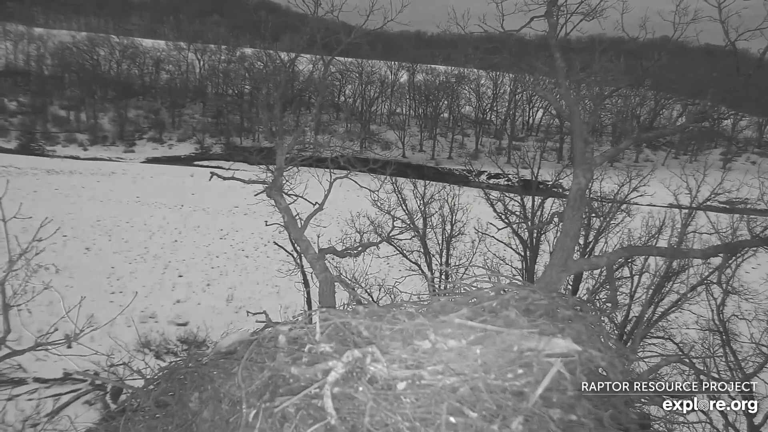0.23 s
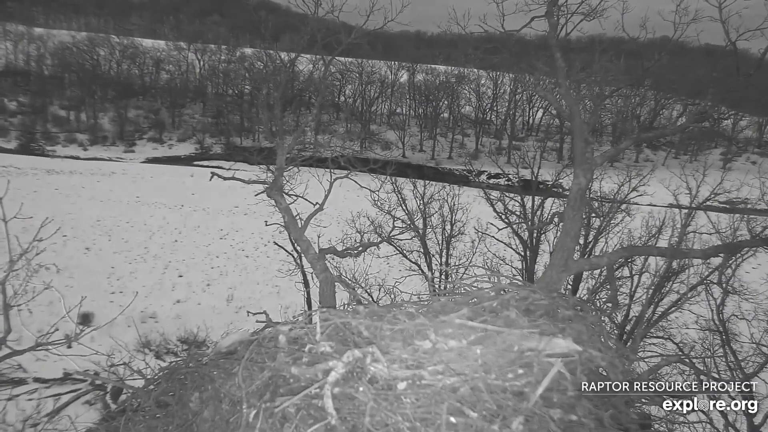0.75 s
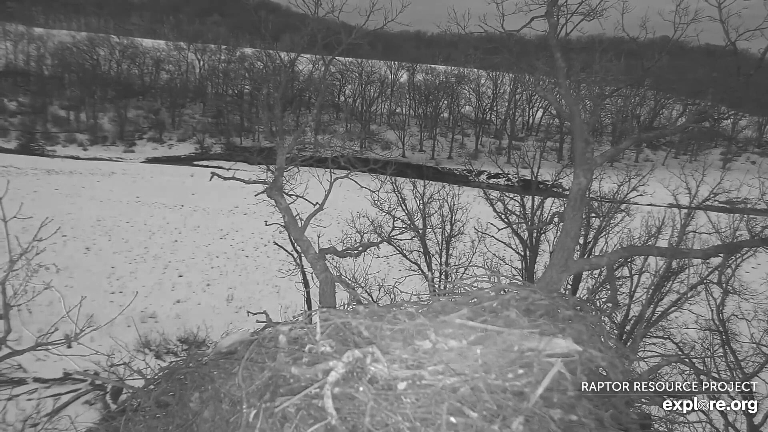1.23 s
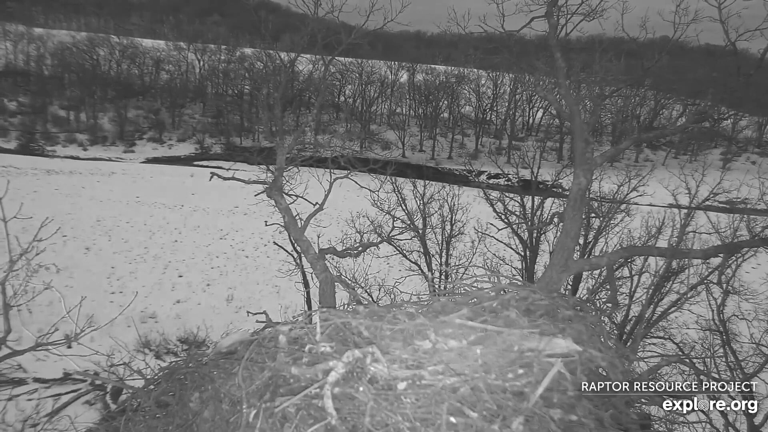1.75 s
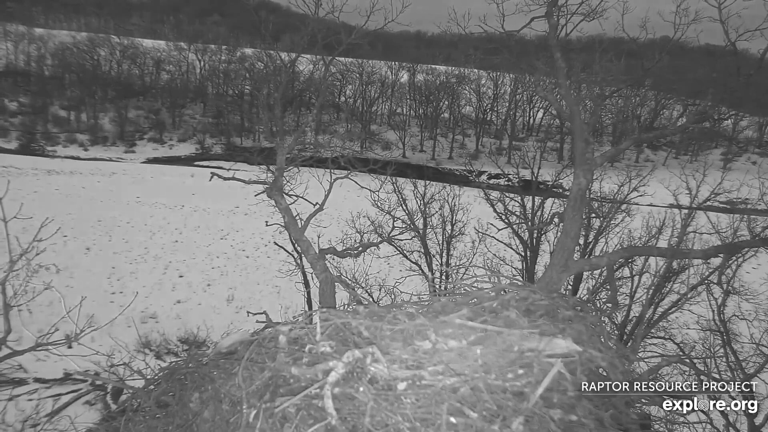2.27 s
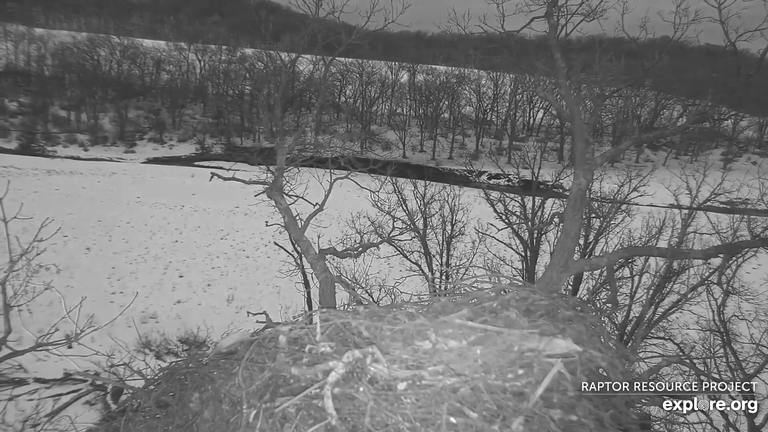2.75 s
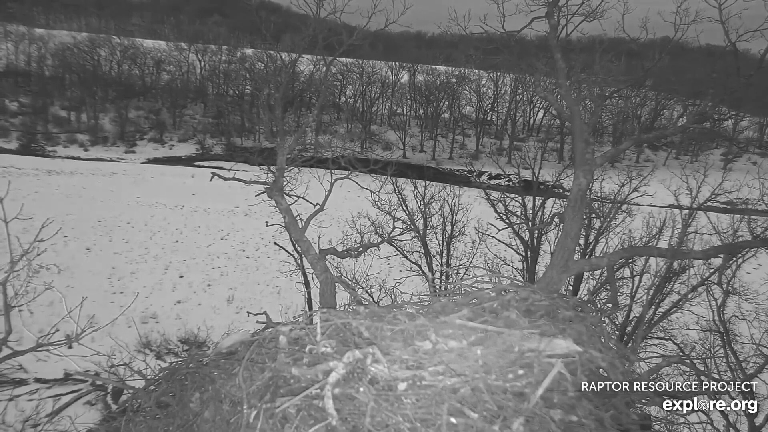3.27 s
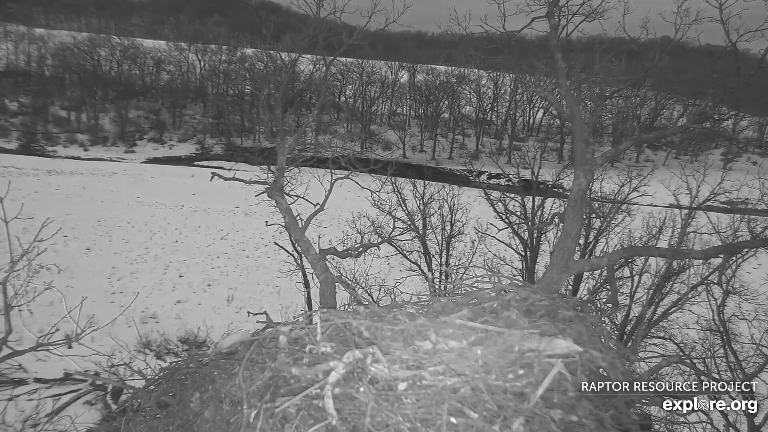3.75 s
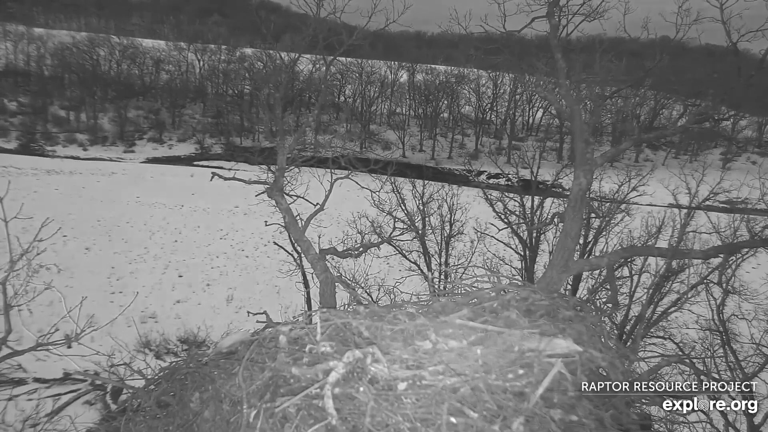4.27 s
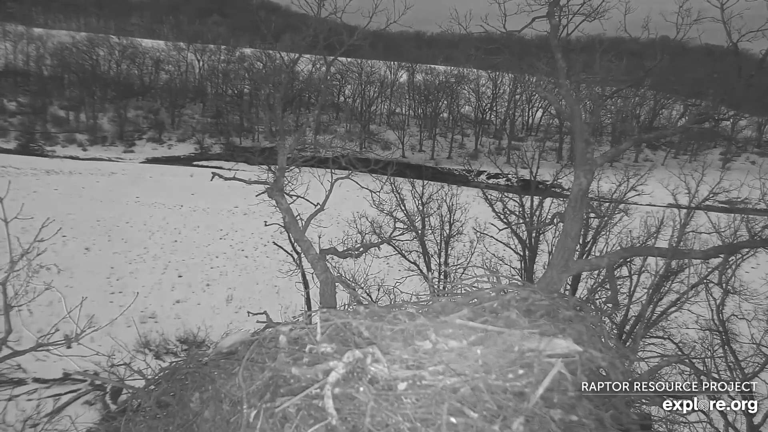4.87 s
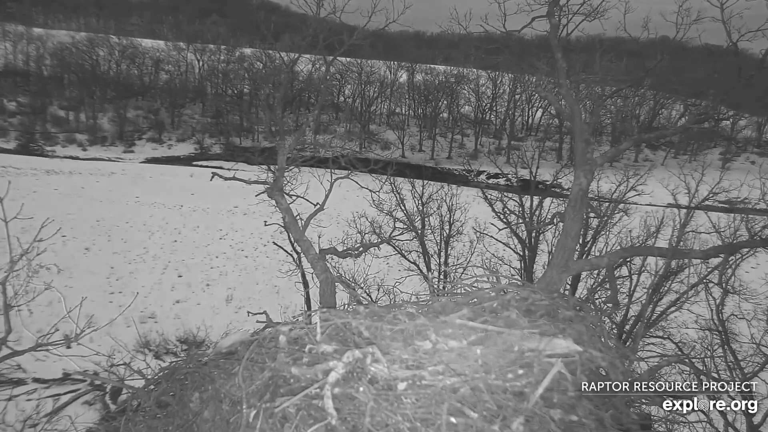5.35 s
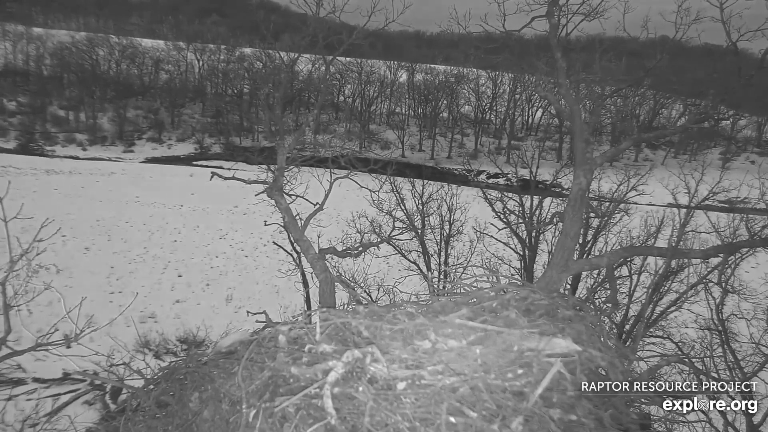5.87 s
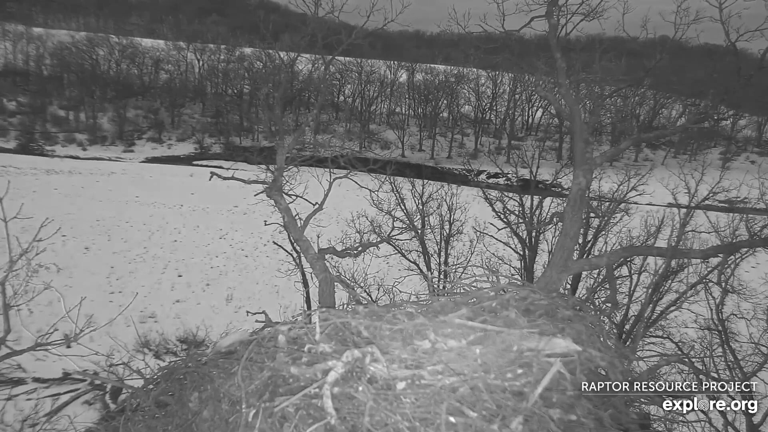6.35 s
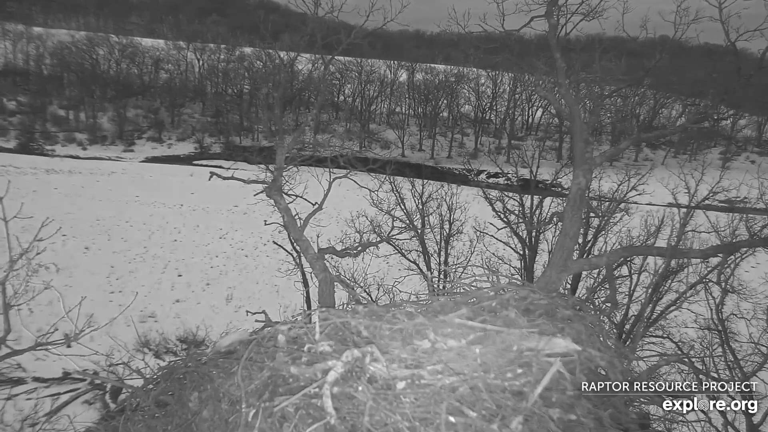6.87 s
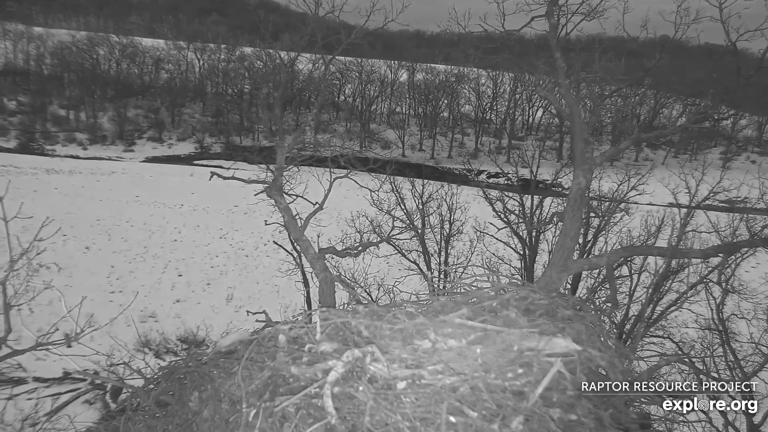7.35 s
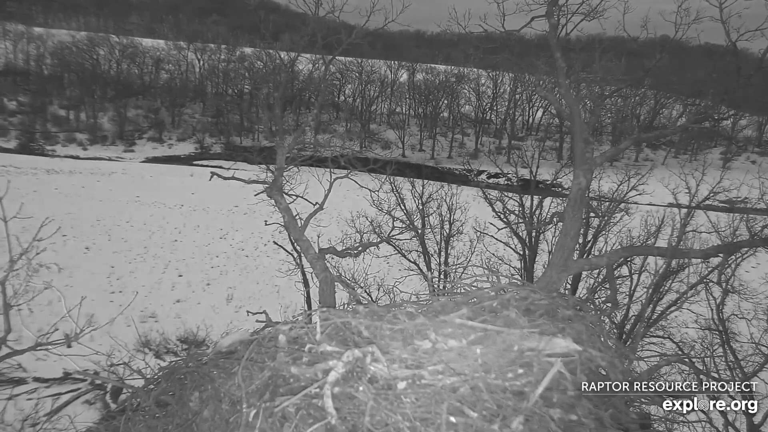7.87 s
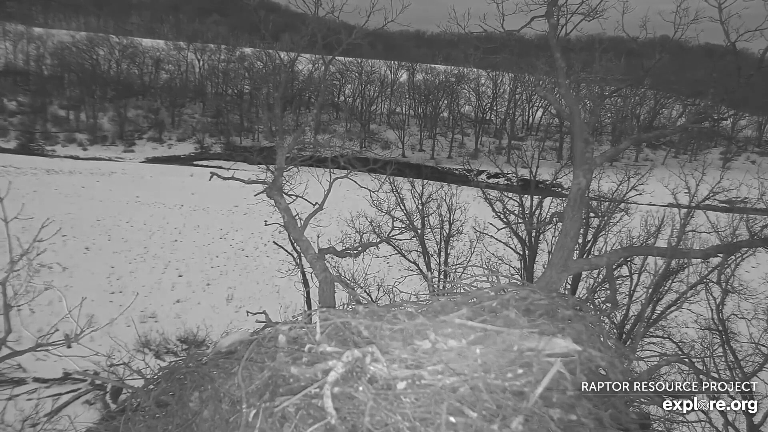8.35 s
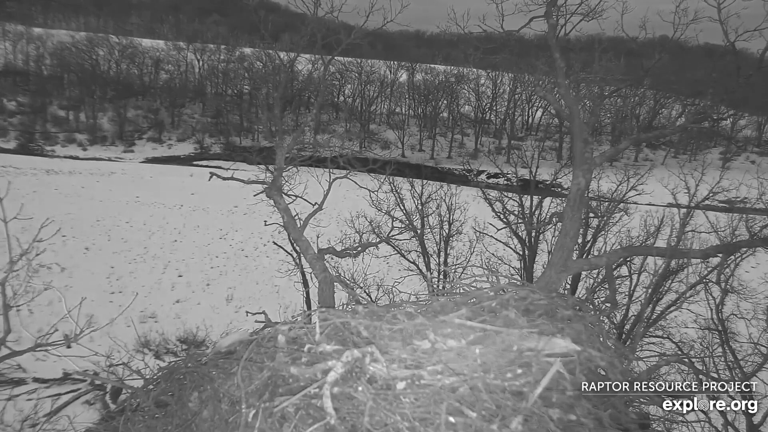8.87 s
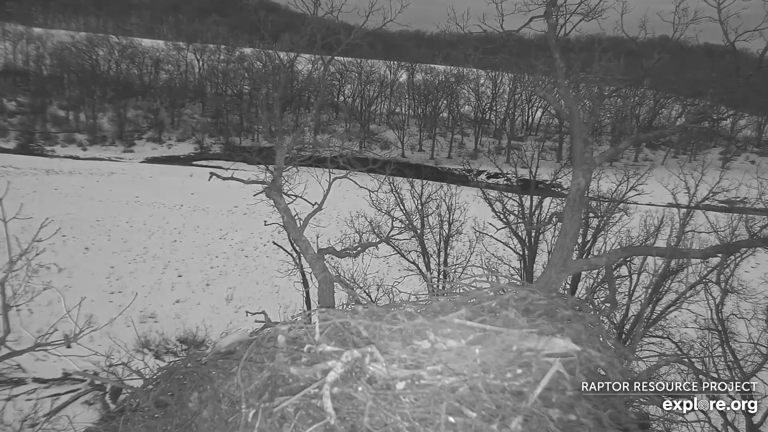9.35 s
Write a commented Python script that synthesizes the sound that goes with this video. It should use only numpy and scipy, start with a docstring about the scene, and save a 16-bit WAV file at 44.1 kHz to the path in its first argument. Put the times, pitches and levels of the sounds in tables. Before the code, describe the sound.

A bald eagle gives five hoarse squeaky yelps, then four chattering runs of high, mostly descending piping notes, over a steady low outdoor rumble.

```python
"""High in a tree, a microphone close to the nest hears a bald eagle over a steady far rumble, drones and hiss.
After faint twig ticks come five squeaky, hoarse yelps, then four chattering runs of mostly descending notes.
Notes are sums of trembling harmonics, squeals are gliding sines, rasps are random puffs ringing the throat.
The rest is shaped noise, wavering sines and damped ticks; limbs, twigs and woods echo the bird and the ticks."""
import sys
import numpy as np
from scipy import signal
from scipy.fft import rfft, irfft, next_fast_len
from scipy.io import wavfile

SR = 44100
rng = np.random.default_rng(int(sys.argv[2]) if len(sys.argv) > 2 else 0)


def digitize_waveform(pressure):
    """Quantize a signal to 16-bit integers and store it at the path in sys.argv[1].

    Rows of a 2-D input are taken as channels; values are limited to [-1, 1].
    """
    field = np.atleast_2d(pressure).T
    bounded = np.clip(field, -1, 1)
    quanta = np.round(bounded * 32767).astype(np.int16)
    wavfile.write(sys.argv[1], SR, quanta)


N = 424241  # samples, about 9.6 s

# Distant rumble. Each row: frequency in Hz, relative density in dB per Hz.
RUMBLE_SPECTRUM = [(20, -34), (40, -36.5), (58, -17.5), (70, -11), (88, -7), (100, -2), (150, 1), (210, -7),
                   (300, -13), (400, -21.5), (510, -30.5), (750, -33.5), (1200, -46), (2200, -60.5),
                   (5000, -81)]
# Slow swell of the rumble. Each row: time in seconds, relative levels of deep roar, body and upper wash in dB.
RUMBLE_SWELL = [(0, -21, -31, -50), (1.8, -20, -31, -50), (2.5, -19, -29, -49), (3.7, -21.5, -30.5, -49),
                (4.2, -22, -33.5, -50), (5.6, -21, -31.5, -52), (7.3, -19.5, -32, -49),
                (9.6, -19, -31, -48.5)]
# Wavering drones of far machinery. Each row: pitch in Hz, rms waver in Hz, level before fading in dB.
MACHINE_DRONES = [(72.45, 0.75, -39.5), (95.83, 0.31, -25), (103.1, .9, -32.5), (142.9, 2.54, -31.5)]
# Microphone hiss. Each row: frequency in Hz, relative density in dB per Hz.
HISS_SPECTRUM = [(1000, -42), (2300, -18.5), (3300, -9), (5000, -5), (7500, -3), (11000, 0.5), (15500, 1.5)]
# Faint twig ticks in the nest. Each row: start in seconds, central pitch in Hz, relative level in dB.
TWIG_TICKS = [(.939, 5030, -49.5), (1.002, 4900, -48), (1.009, 5600, -42), (1.081, 5300, -48),
              (1.133, 5100, -45), (3.935, 6560, -41.5)]
# Early reflections off nest and limbs. Each row: delay in seconds, relative gain.
LIMB_REFLECTIONS = [(.0047, 0.018), (.0093, -0.17), (0.0128, -0.03), (0.0193, 0.5), (.0285, -.17),
                    (.039, 0.021)]
# Ring of the woods. Each row: frequency in Hz, time to fall 60 dB in seconds.
WOODS_RING = [(1000, 0.098), (2200, 0.54), (2900, 0.64), (3600, 0.47), (6000, 0.48), (10000, 0.053)]
# Echo share as the bird yelps towards the microphone, then throws its head back to chatter.
# Each row: time in seconds, level sent to the echoes in dB.
HEAD_TURN_ECHO = [(1.9, -5), (3.7, -6), (4.4, 1.5), (9.6, -5.5)]
# Windpipe and beak passing the harmonics of every whistle. Each row: frequency in Hz, gain in dB.
WINDPIPE_GAIN = [(2100, -1.5), (2800, -4), (3050, -6.5), (3450, -1.5), (3800, -3.5), (4250, -2.5),
                 (5350, -16), (5650, -1.5), (6100, 0.5), (6400, -7.5), (7100, -16.5), (8350, -41),
                 (8800, -13.5), (9150, -10.5), (10400, -36), (12000, -26), (14000, -38)]
# The bird's excitement, which sets top harmonics and scratch. Each row: time in seconds, excitement in dB.
EXCITEMENT_CURVE = [(3.2, 7), (4.7, -13), (5.8, -12.5), (7.4, 1.5), (9.2, 1.5)]
# Resonances of the wide open throat. Each row: frequency in Hz, width in Hz, relative level in dB.
THROAT_RESONANCES = [(920, 290, -1), (1306, 340, -3.5), (2040, 1300, -6), (2830, 340, -4), (3570, 480, 4),
                     (4340, 150, 0), (5160, 540, 1), (6180, 1600, 1)]
# Yelps: a whistle over a lower tone that turns hoarse, breaks, and closes with a croak.
# Each row: start in seconds, length in seconds, pitch in Hz, relative level in dB, extra level of the octave
# in dB, scoop as a share of pitch, lower tone in relative dB, delay to the break in seconds, break in
# relative dB, delay to the closing in seconds, croak in relative dB.
YELP_NOTES = [(1.949, .016, 3470, -23, -20, 0.093, -58, 0.14, -31.5, 0.17, -56),
              (2.325, .017, 3465, -18, -10, .04, -45, 0.13, -30, 0.16, -49),
              (2.734, 0.023, 3432, -17.5, -2.5, 0.026, -48, 0.11, -32, 0.14, -52),
              (3.144, 0.041, 2822, -25.5, -3, .12, -45, .088, -46, .142, -35),
              (3.582, 0.038, 3474, -23.5, 1, 0.023, -43, 0.075, -53, 0.12, -42)]
# Thin squeals where the voice breaks.
# Each row: start in seconds, length in seconds, start pitch in Hz, end pitch in Hz, relative level in dB.
VOICE_BREAKS = [(2.033, 0.085, 5400, 6400, -36.5), (2.411, 0.059, 5620, 6200, -35),
                (2.818, 0.076, 6350, 6370, -40), (3.583, .025, 4040, 4050, -43),
                (3.597, 0.017, 6330, 6200, -33), (4.49, .022, 6670, 6500, -44),
                (8.22, .082, 3870, 3790, -56), (8.87, .01, 5540, 5120, -27.5)]
# Chatter on the low side of the syrinx, in four runs.
# Each row: start in seconds, length in seconds, pitch in Hz, relative level in dB, extra of the octave in dB.
LOW_SIDE_NOTES = [(4.477, 0.035, 3034, -32, -8), (4.59, 0.025, 2990, -32, -6.5),
                  (4.686, 0.026, 2923, -32, 0), (4.798, 0.04, 2850, -40, 3), (4.904, 0.026, 2700, -49, -12),
                  (5.494, 0.0504, 2955, -27.5, -3), (5.605, 0.053, 3000, -55, -6),
                  (5.719, 0.041, 2960, -31, -0.5), (5.831, 0.048, 2935, -29.5, -2),
                  (5.951, 0.041, 2852, -37, 2), (6.08, .045, 2806, -38.5, -0.5),
                  (6.217, 0.029, 2096, -41, -3), (7.116, 0.06, 3006, -25, 0.5),
                  (7.24, 0.029, 2985, -43, -4), (7.361, 0.055, 3025, -28, -3),
                  (7.492, 0.062, 2924, -27, -4), (7.627, 0.068, 2910, -31.5, 2),
                  (7.775, .057, 2833, -29, -1.5), (7.927, 0.057, 2843, -33.5, -4.5),
                  (8.09, 0.039, 2130, -45.5, 9), (8.77, 0.07, 2956, -27.5, 1),
                  (8.883, 0.054, 3070, -28, -1.5), (9, 0.046, 3038, -25, -2.5),
                  (9.118, 0.04, 2960, -29, 5.5), (9.247, .056, 2854, -28.5, 2),
                  (9.382, 0.054, 2816, -27, 1.5), (9.516, 0.039, 2762, -34, 1.5)]
# Notes of the high side of the syrinx.
# Each row: start in seconds, length in seconds, pitch in Hz, relative level in dB.
HIGH_SIDE_NOTES = [(4.47, 0.025, 3520, -28.5), (4.581, .021, 3560, -25.5), (5.602, 0.036, 3580, -28),
                   (5.712, .022, 3550, -31), (7.239, 0.047, 3680, -25.5), (8.087, 0.026, 3535, -50),
                   (8.903, 0.032, 3760, -27)]
# Colour of the sputtering air in the narrowed throat. Each row: frequency in Hz, relative level in dB.
SPUTTER_COLOUR = [(1200, -9), (2500, -31), (3600, 1), (4400, 1), (5100, 1), (6500, -9), (8000, -42),
                  (12000, -38)]
# Soft buffet of wind under the rumble. Each row: start in seconds, length in seconds, level in dB.
WIND_BUFFETS = [(8.04, 0.44, -26.5)]


def gain_of(db):
    """Decibels to amplitude."""
    return 10 ** (np.asarray(db) / 20)


def evened(x):
    """Scales to rms 1."""
    return x / np.sqrt(np.mean(x ** 2) + 1e-20)


def read(points, hz):
    """Reads a spectrum table on a log-frequency axis."""
    f, value = np.transpose(points)
    return np.interp(np.log(hz + 1), np.log(f + 1), value)


def add(mix, start, sound):
    """Mixes a sound in at a time in seconds."""
    part = mix[round(start * SR):][:len(sound)]
    part += sound[:len(part)]


def noise(shape):
    """Noise of rms 1 whose amplitude spectrum is shape(Hz)."""
    size = next_fast_len(N, True)
    spectrum = rfft(rng.standard_normal(size))
    return evened(irfft(spectrum * shape(np.fft.rfftfreq(size, 1 / SR)), size)[:N])


def wander(rate_hz):
    """Smooth chance motion of rms 1, up to about the given rate."""
    return noise(lambda hz: np.exp(-(hz / rate_hz) ** 2))


def tremor(rate_hz, size):
    """A short stretch of smooth chance motion, scaled to rms 1 before it is cut to size."""
    hz = np.fft.rfftfreq(8192, 1 / SR)
    spectrum = rfft(rng.standard_normal(8192))
    return evened(irfft(spectrum * np.exp(-(hz / rate_hz) ** 2)))[:size]


def gesture(start, length, rise, fall):
    """Sample places, own time and envelope of one push of air: smooth rise, hold, quick decay (seconds)."""
    end = min(N, round((start + length + .05) * SR))  # leaves 50 ms for the decay
    at = np.arange(round(start * SR), end)
    t = (at - at[0]) / SR
    attack = np.sin(np.pi / 2 * np.minimum(t / rise, 1)) ** 2
    decay = np.exp(-np.maximum(t - length, 0) / fall)
    return at, t, attack * decay


def pushes(rows, rise, fall):
    """Amplitude curve of a table of air bursts."""
    level = np.zeros(N)
    for start, length, db in rows:
        add(level, start, gain_of(db) * gesture(start, length, rise, fall)[2])
    return level


def rumble(deep_db=-1.28, body_db=0.0, wash_db=1.0):
    """Far traffic and moving air: a deep roar, a body and a softer wash, each swelling slowly."""
    times, *swells = np.transpose(RUMBLE_SWELL)
    edges_hz = [0, 235, 510, SR]
    out = np.zeros(N)
    for low, high, swell, trim_db in zip(edges_hz, edges_hz[1:], swells, [deep_db, body_db, wash_db]):
        air = noise(lambda hz: gain_of(read(RUMBLE_SPECTRUM, hz)) * (hz > low) * (hz <= high))
        out += air * gain_of(trim_db + np.interp(np.arange(N) / SR, times, swell))
    return out


def drones(fading_db=1.44):
    """Low machine tones drift and fade on their long way through the air."""
    out = np.zeros(N)
    for hz, waver_hz, db in MACHINE_DRONES:
        phase = 2 * np.pi * np.cumsum(hz + waver_hz * wander(3.107)) / SR
        out += np.sqrt(2) * np.sin(phase) * gain_of(db + fading_db * wander(3.5))
    return out


def microphone_hiss(level_db=-42.5):
    """Steady noise that grows towards the treble; its level holds before the band limit."""
    return gain_of(level_db) * noise(lambda hz: gain_of(read(HISS_SPECTRUM, hz)))


def twigs(t60=0.028, spread=0.102):
    """A dry twig gives a tiny tick: three sines scattered about its pitch, damped together."""
    out, t = np.zeros(N), np.arange(1024) / SR
    for start, hz, db in TWIG_TICKS:
        pitches = hz * (1 + spread * rng.standard_normal(3))
        ring = sum(np.sin(2 * np.pi * pitch * t) for pitch in pitches)
        add(out, start, ring * gain_of(db - 60 * t / t60))
    return out


def treetop(x, limbs=0.86, twigs_db=-13, twigs_t60=0.57, woods_db=-17):
    """Single reflections off the limbs, a quick scatter from twigs, and a faint tail from the woods."""
    t = np.arange(SR) / SR
    # sparse random impulses of either sign, about 2500 per second
    near, far = rng.choice([-1., 1.], (2, SR)) * (rng.random((2, SR)) < 2500 / SR)
    # the woods build up slowly, then each frequency decays at its own rate
    hz, age, z = signal.stft(far * (1 - np.exp(-t / 0.087)), SR, nperseg=256)
    decay = gain_of(-60 * age / read(WOODS_RING, hz)[:, None])
    tail = signal.istft(z * decay, SR, nperseg=256)[1][:SR]
    scatter = near * (1 - np.exp(-t / 0.0022)) * np.exp(-np.log(1000) * t / twigs_t60)
    echo = gain_of(woods_db) * tail / np.linalg.norm(tail)
    echo += gain_of(twigs_db) * scatter / np.linalg.norm(scatter)
    for delay, gain in LIMB_REFLECTIONS:
        add(echo, delay, [limbs * gain])
    sent = x * gain_of(np.interp(np.arange(N) / SR, *np.transpose(HEAD_TURN_ECHO)))
    return x + signal.fftconvolve(sent, echo)[:N]


def excitement(time):
    """Excitement in dB at a time in seconds."""
    return np.interp(time, *np.transpose(EXCITEMENT_CURVE))


def whistle(start, length, hz, db, octave_db, scoop, attack, rough, jitter=0.0079, shimmer_db=3.0,
            scoop_share=0.38, sag=0.004, swell_db=3.0, easing_db=3.5, dulling_db=9, level_db=0.84):
    """A note scoops up, swells and eases off as its top harmonics fade; the membranes tremble slightly."""
    at, t, envelope = gesture(start, length, rise=max(attack, .003), fall=0.0041)
    progress = np.minimum(t / length, 1) - .5  # -0.5 at the start, 0.5 at the end
    lag = np.exp(-(progress + .5) / scoop_share) - np.exp(-.5 / scoop_share)
    easing = (2 * np.maximum(progress, 0)) ** 2
    tremble = jitter * tremor(123, len(t)) + rough * tremor(1270, len(t))
    phase = 2 * np.pi * np.cumsum(hz * (1 - scoop * lag - sag * easing + tremble)) / SR
    top = excitement(start) - dulling_db * progress
    levels = [swell_db * progress, octave_db + .5 * swell_db * progress, top, top]
    tone = np.zeros(len(t))
    for k, harmonic_db in enumerate(levels, 1):
        tone += gain_of(harmonic_db + read(WINDPIPE_GAIN, k * hz)) * np.sin(k * phase)
    loudness = gain_of(db + level_db - easing_db * easing + shimmer_db * tremor(137, len(t)))
    return start, np.sqrt(2) * tone * envelope * loudness


def squeal(start, length, start_hz, end_hz, db, rough=0.038, shimmer_db=3):
    """A tight membrane slides from one pitch to another, jumping about and sputtering as it goes."""
    at, t, envelope = gesture(start, length, rise=0.0064, fall=0.0012)
    tremble = rough * tremor(900, len(t)) + .007 * tremor(90, len(t))
    hz = end_hz + (start_hz - end_hz) * np.maximum(1 - t / length, 0) ** 2
    phase = 2 * np.pi * np.cumsum(hz * (1 + tremble)) / SR
    # the squeal flares where its glide crosses a throat resonance
    flare = np.zeros(len(t))
    for mode_hz, width, mode_db in THROAT_RESONANCES:
        flare += gain_of(mode_db) / (1 + (2 * (hz - mode_hz) / width) ** 2)
    flare /= np.average(flare, weights=envelope)
    level = gain_of(db + shimmer_db * tremor(290, len(t))) * flare
    return start, np.sqrt(2) * np.sin(phase) * envelope * level


def rasp(start, length, fall, db, lean_db, puffs_per_s=300):
    """Irregular puffs ring the throat, striking its resonances unequally; lean_db tilts them per octave."""
    at, _, envelope = gesture(start, length, rise=0.0062, fall=fall)
    voice, t = np.zeros(len(at)), np.arange(512) / SR
    for hz, width, mode_db in THROAT_RESONANCES:
        ring = evened(t * np.exp(-np.pi * width * t) * np.sin(2 * np.pi * hz * t))
        puffs = rng.random(len(at)) < puffs_per_s / SR
        drive = rng.standard_normal(len(at)) * (puffs + 0.053)  # a little steady air between the puffs
        voice += gain_of(mode_db + lean_db * np.log2(hz)) * signal.fftconvolve(drive, ring)[:len(at)]
    return start, gain_of(db) * evened(voice) * envelope


def yelps(hoarse_after=.025, knot_after=0.011, croak_after=.009,
          thump_hz=280, thump_width_hz=170, thump_db=-31):
    """Whistle over a lower tone, a rasp, a falling break caught on a brief tone, then rasp, croak and thump."""
    out, closings = np.zeros(N), []
    for (start, length, hz, db, octave_db, scoop, lower_db,
         break_after, break_db, close_after, croak_db) in YELP_NOTES:
        breaks, closes = start + break_after, start + close_after
        add(out, *whistle(start, length, hz, db, octave_db, scoop, attack=0.013, rough=0.008))
        # faint lower tone, starting just ahead of the whistle
        add(out, *squeal(start - .007, 1.45 * length, start_hz=2850, end_hz=3000, db=lower_db, rough=.015))
        add(out, *rasp(start + hoarse_after, length=0.042, fall=0.041, db=-42, lean_db=.5))
        # the voice breaks downwards and catches on a brief tone
        add(out, *squeal(breaks, .014, start_hz=5700, end_hz=3910, db=break_db, rough=0.067, shimmer_db=2.5))
        add(out, *squeal(breaks + knot_after, 0.015, start_hz=4310, end_hz=4230, db=break_db - 2.5,
                         rough=0.011, shimmer_db=-1))
        add(out, *rasp(breaks, length=0.029, fall=0.035, db=-40, lean_db=1.5))
        # dull rasp and croak at the closing
        add(out, *rasp(closes, length=0.019, fall=0.024, db=-39.0, lean_db=-6))
        add(out, *squeal(closes + croak_after, length=.018, start_hz=1057, end_hz=916, db=croak_db))
        closings.append((closes, .03, thump_db))
    thump = noise(lambda hz: np.exp(-(2 * (hz - thump_hz) / thump_width_hz) ** 2))
    return out + thump * pushes(closings, rise=0.0033, fall=0.017)


def voice_breaks():
    """Thin squeals of a tight membrane, among the yelps and the chatter."""
    out = np.zeros(N)
    for row in VOICE_BREAKS:
        add(out, *squeal(*row))
    return out


def sputter(puffs_per_s=900, steady=.07):
    """Tiny irregular puffs over a little steady air, coloured by the narrowed throat."""
    puffs = rng.random(N) < puffs_per_s / SR
    drive = rng.standard_normal(N) * (puffs + steady)
    size = next_fast_len(N, True)
    colour = gain_of(read(SPUTTER_COLOUR, np.fft.rfftfreq(size, 1 / SR)))
    return evened(irfft(rfft(drive, size) * colour, size)[:N])


def scratch(start, strain, air, lead_s=0.0037, strain_lead_s=.012, air_db=-50, strain_db=8,
            excited_share=0.47, rattle_db=2.5):
    """Sputtering air and a falling scrape lead into a note; strain lengthens the lead and lifts a squeak."""
    db = air_db + strain_db * strain + excited_share * excitement(start)
    lead = lead_s + strain_lead_s * strain
    at, t, envelope = gesture(start - lead, length=lead + .028, rise=0.013, fall=.008)
    rattle = air[at] * envelope * gain_of(db + rattle_db * tremor(260, len(t)))
    scrape = squeal(start - lead, length=0.0184, start_hz=5310, end_hz=4530, db=db - 1.5, rough=0.059)
    squeak = squeal(start, length=0.006, start_hz=6770, end_hz=6940, db=db - 13 + 24 * strain, rough=0.03)
    return [(start - lead, rattle), scrape, squeak]


def chatter(relaxed_hz=2830, strained_hz=3000, pause_s=.4):
    """A run opens clean unless both syrinx sides start together; other notes get scratchier with pitch."""
    out, last = np.zeros(N), 0
    air = sputter()
    for start, length, hz, db, octave_db in LOW_SIDE_NOTES:
        strain = np.clip((hz - relaxed_hz) / (strained_hz - relaxed_hz), 0, 1)
        both_sides = any(abs(high[0] - start) < length for high in HIGH_SIDE_NOTES)
        opens_run = start - last > pause_s
        if opens_run and not both_sides:
            add(out, *whistle(start, length, hz, db, octave_db, scoop=.062, attack=0.01, rough=.009))
        else:
            rough = .006 + 0.0035 * strain
            add(out, *whistle(start, length, hz, db, octave_db, scoop=0.018, attack=0.005, rough=rough))
            for part in scratch(start, strain, air):
                add(out, *part)
        last = start
    for row in HIGH_SIDE_NOTES:
        add(out, *whistle(*row, octave_db=0, scoop=0.019, attack=0.014, rough=0.011))
    return out


def buffet(centre_hz=82, width_hz=60):
    """A breeze swells briefly in the bass."""
    air = noise(lambda hz: np.exp(-(2 * (hz - centre_hz) / width_hz) ** 2))
    return air * pushes(WIND_BUFFETS, rise=0.078, fall=.02)


def scene():
    """The eagle and twigs echo in the tree; the background stays dry."""
    nest = treetop(twigs() + yelps() + voice_breaks() + chatter())
    background = rumble() + drones() + microphone_hiss() + buffet()
    return (nest + background)[None]


def record(dry, edge_hz=15560):
    """The band limit of the microphone chain, a steep low-pass."""
    low_pass = signal.firwin(1023, edge_hz, window=("kaiser", 9), fs=SR)
    return signal.oaconvolve(dry, low_pass[None], "same")


dry = scene()
out = record(dry)
digitize_waveform(out)
```